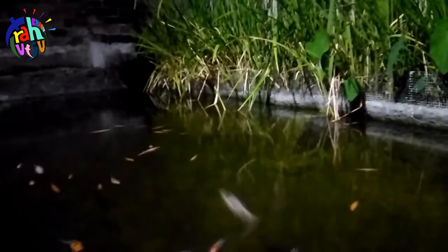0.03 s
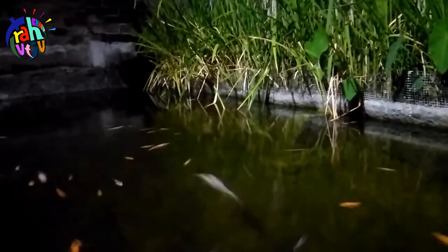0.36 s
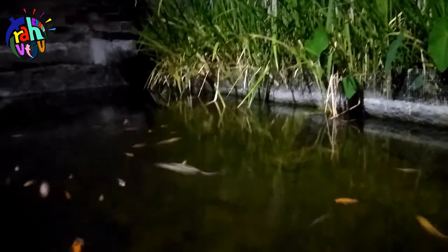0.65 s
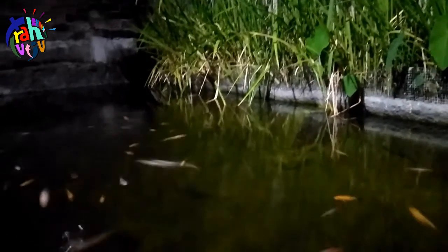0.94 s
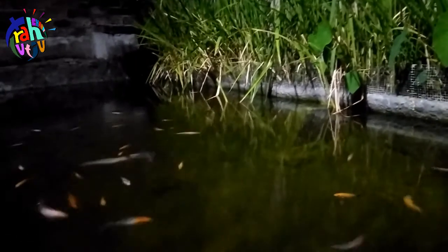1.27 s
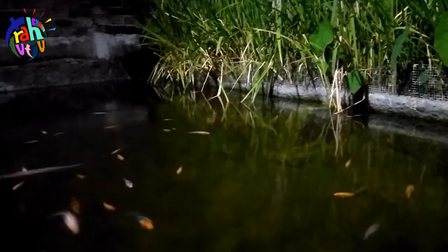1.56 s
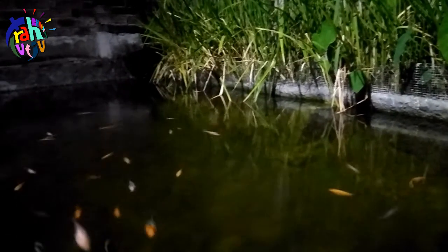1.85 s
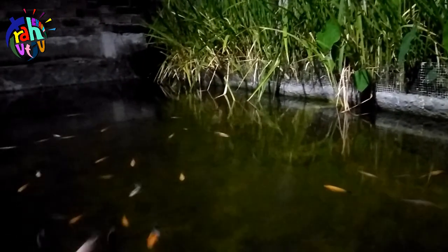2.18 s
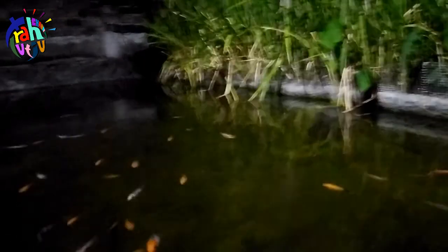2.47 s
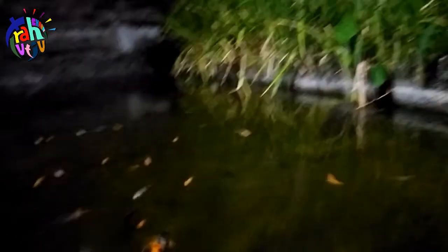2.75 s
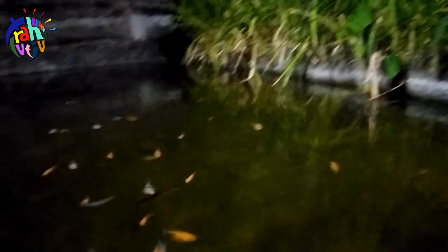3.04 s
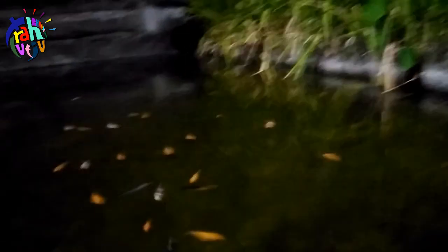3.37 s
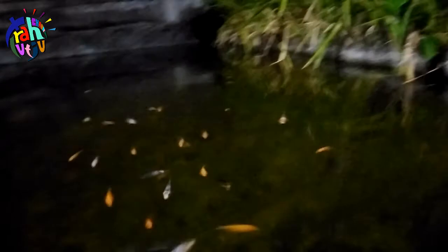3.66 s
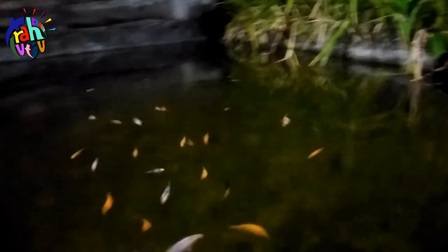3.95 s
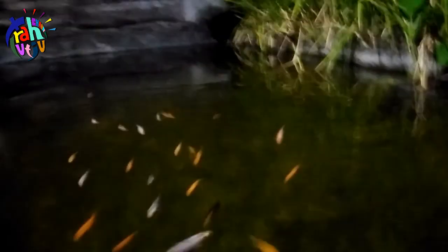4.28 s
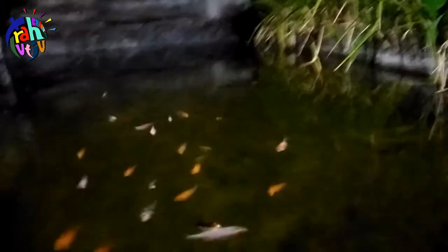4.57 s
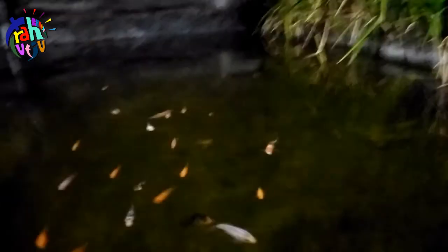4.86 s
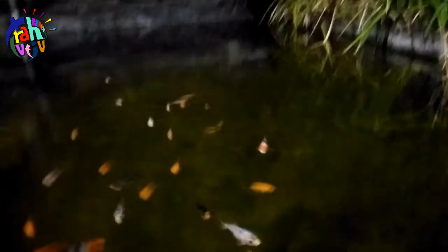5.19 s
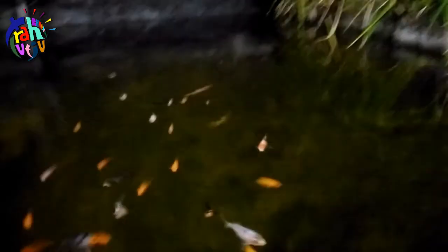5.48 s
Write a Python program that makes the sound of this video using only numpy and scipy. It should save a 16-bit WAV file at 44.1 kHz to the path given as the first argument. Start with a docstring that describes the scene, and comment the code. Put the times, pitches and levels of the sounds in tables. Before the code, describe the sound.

Loud, pulsing frog trill at a garden pond at night, ending to reveal softly trickling water and a few small drips.

```python
"""A tree frog trills beside a garden pond at night: 27 notes, each a rattle of vocal-sac pulses
that slows as the frog tires. Stone walls and the water throw every pulse back, and the frog is
louder on the left until the microphone turns. A thin trickle runs into the pond with ringing
drips and clicks of spray, over a low rumble, hiss and faint tones. The recorder's uneven
sampling adds a metallic sheen."""
import sys
import numpy as np
from scipy import signal
from scipy.fft import rfft, irfft
from scipy.io import wavfile
from scipy.ndimage import uniform_filter1d, map_coordinates

SR = 44100
rng = np.random.default_rng(int(sys.argv[2]) if len(sys.argv) > 2 else 0)


def generate_wav(signal):
    """Clip the signal to [-1, 1] and save it as 16-bit WAV at the path in sys.argv[1]."""
    frames = np.transpose(np.atleast_2d(signal))
    scaled = np.clip(frames, -1, 1) * 32767
    pcm = np.round(scaled).astype(np.int16)
    wavfile.write(sys.argv[1], SR, pcm)


N = 243431
TIME = np.arange(N) / SR
PITCH_HZ = 1376.6  # main ring of the vocal sac

# the frog at the pond's edge: (note start [s], slow pulses [count])
NOTES = [(.005, 2), (.173, 2), (.340, 2), (.506, 2), (.675, 3), (.864, 2), (1.035, 2), (1.205, 2),
         (1.378, 2), (1.550, 2), (1.718, 3), (1.902, 2), (2.067, 2), (2.234, 3), (2.422, 3), (2.608, 3),
         (2.793, 3), (2.980, 2), (3.151, 2), (3.322, 3), (3.512, 2), (3.683, 3), (3.873, 2), (4.048, 2),
         (4.221, 2), (4.410, 2), (4.589, 2)]
def tree_frog():
    """The frog repeats its rattling note in one long trill."""
    trill = np.zeros((2, N))
    for start, slow_count in NOTES:
        add(trill, start, note(start, slow_count))
    return trill


# how hard the frog pushes: (time [s], effort [dB])
EFFORT = [(0, -0.8), (.9, -1), (1.35, -1.5), (2.1, -0.5), (2.5, 0.5), (3.2, -2), (3.8, -1), (4.3, -4),
          (4.6, -2)]
def note(start, slow_count, waver=0.0067, longer_ring_from_s=3.9, turn_start_s=2.08, turn_length_s=2.537):
    """A run of pulses rings the vocal sac, heard from a slowly turning microphone."""
    t = np.arange(round(.2 * SR)) / SR
    effort_db = np.interp(start, *np.transpose(EFFORT))
    # the last notes ring longer and purer
    stretch = np.interp(start, [longer_ring_from_s, NOTES[-1][0]], [1, 1.08])
    times, sizes = pulse_train(slow_count, effort_db)
    pitches = PITCH_HZ * (1 + waver * rng.standard_normal(len(times)))
    voice = np.zeros((2, len(t)))
    for when, size, hz in zip(times, sizes, pitches):
        add(voice, when, size * sac_pulse(hz, stretch))
    turn = np.clip((start - turn_start_s) / turn_length_s, 0, 1)
    heard = near_echoes(voice, turn)
    octave_onset = times[-len(CLOSING) + 1]  # second pulse of the closing run
    heard += bright_octave(t - octave_onset, start, pitches[-1], effort_db)
    side_db = np.array([[-23], [-27.5 + 5 * turn]])  # the turn brings up the right side
    return gain_of(side_db + 0.45 * effort_db) * heard


# quick pulses that open a note: (time in the note [ms], relative level [dB])
OPENING = [(0, 2.34), (8.4, 2), (17.6, 0.5)]
# the quickening run that closes it: (time in the run [ms], relative level [dB])
CLOSING = [(0, 4), (8.6, 4), (15.4, -8.5), (19.4, -6), (23.3, -4.5)]
def pulse_train(slow_count, effort_db, slack_ms_per_db=0.88, jitter_ms=0.2775, uneven_db=1.42):
    """Pulse times [s] and sizes: less effort spaces out the slow middle and weakens the closing run."""
    gap_ms = 18.1 - slack_ms_per_db * effort_db
    *slow_ms, close_ms = OPENING[-1][0] + gap_ms * np.arange(1, round(slow_count) + 2)
    middle = [(ms, 0) for ms in slow_ms]
    closing = [(close_ms + ms, db + effort_db) for ms, db in CLOSING]
    ms, db = np.transpose(OPENING + middle + closing)
    times = (ms + jitter_ms * rng.standard_normal(len(ms))) / 1000
    # the last pulses fall in step with the still-ringing sac and merge into a slightly flat tone
    cycle = 1 / (PITCH_HZ * .96)
    times[-2:] = times[-3] + np.round((times[-2:] - times[-3]) / cycle) * cycle
    return times, gain_of(db + uneven_db * rng.standard_normal(len(ms)))


# sac modes: (frequency [x pitch], swell time [ms], relative level [dB], left emphasis [dB])
SAC_MODES = [(0.388, 0.8, -27, 8.5), (0.534, 1.83, -26.5, 8.5), (0.999, 0.54, 9, 4.5),
             (1.281, 2.4, -28.5, 12.5), (1.516, 0.47, -24, 11.5), (1.9, 0.61, -14.5, 5.5),
             (2.24, 1.3, -27, -9), (2.38, 0.39, -22, 4.5)]
def sac_pulse(pitch_hz, stretch):
    """One pulse rings every mode of the vocal sac, with a different colour on each side."""
    t = np.arange(SR // 24) / SR
    return sum(gain_of([[db + left_db], [db]]) * ring(t, pitch_hz * multiple, stretch * swell_ms / 1000)
               for multiple, swell_ms, db, left_db in SAC_MODES)


# the overtone that ends each note: (time [s], relative level [dB])
OCTAVE = [(0, -25.5), (1.3, -22), (3.2, -24.5), (3.7, -33)]
def bright_octave(t, note_start, pitch_hz, effort_db, spread_db=2):
    """The closing tone carries a ring about an octave up, stronger in some notes than in others."""
    db = np.interp(note_start, *np.transpose(OCTAVE)) + effort_db + spread_db * rng.standard_normal()
    return gain_of(db) * ring(t, 2655 * pitch_hz / PITCH_HZ, swell_s=.003)


# paths from the frog to each side of the microphone: (delay [ms], relative level [dB])
PATHS_LEFT = [(0.7, -5.4), (3.32, -3.3), (6.5, 0.5), (7.74, -7.3), (11.58, -9.3), (12.98, -5.2),
              (15.02, -5.5), (20.78, -9.1), (23.52, -8.3), (30.82, -10.8), (40.74, -14.9), (44.44, -15.5)]
PATHS_RIGHT = [(0.0, 0.0), (3.44, -14.5), (4.74, -6.6), (6.8, -12.2), (10.54, -13.9), (12.82, -9.9),
               (18.12, -17.3), (20.32, -13.0), (25.72, -16.2), (31.22, -19.1)]
def near_echoes(voice, turn, shift_ms=.26):
    """Nearby stone and water reflect each pulse; the paths shift, mostly late in the turn."""
    length = voice.shape[1]
    hz = np.fft.rfftfreq(length, 1 / SR)
    heard = []
    for side, paths in zip(voice, (PATHS_LEFT, PATHS_RIGHT)):
        delay_ms, path_db = np.transpose(paths)
        delay_ms = delay_ms + shift_ms * turn ** 4.7 * rng.standard_normal(len(paths))
        echoes = gain_of(path_db) @ np.exp(-2j * np.pi * np.outer(delay_ms / 1000, hz))
        heard.append(evened(irfft(rfft(side) * echoes, length)))
    return np.array(heard)


# walls at the far side of the garden: (delay [s], level [dB])
FAR_WALLS = [(0.05, -19.5), (0.063, -27.5), (.079, -25)]
def far_echoes(trill):
    """Distant walls return the trill late and faint."""
    echoes = np.zeros((2, N))
    for delay, db in FAR_WALLS:
        add(echoes, delay, gain_of(db) * trill)
    return echoes


# the loudest drops on the pond, left of the microphone: (time [s], level [dB], bubble pitch [Hz])
DRIPS = [(0.046, -42, 3900), (1.656, -40, 4930), (2.567, -39.5, 3790), (2.737, -42, 5000),
         (3.135, -42, 4086), (3.828, -39.5, 4770), (4.196, -37, 4860), (4.725, -37, 3570),
         (4.792, -41.5, 1930), (4.873, -49, 2360), (5.215, -32.5, 1906), (5.506, -37.5, 3340)]
# sharp clicks of spray, far to the right: (time [s], level [dB], pitch [Hz])
CLICKS = [(0.044, -41, 6700), (.1237, -43.5, 6800), (1.612, -40.5, 5470), (2.4205, -38, 7717),
          (4.108, -44, 8000), (5.1083, -55, 7650), (5.216, -44.5, 5800)]
# fine splashes, also to the right: (time [s], level [dB], length [s])
SPLASHES = [(1.599, -58.5, 0.08), (2.72, -60, 0.06), (4.092, -56, 0.064), (4.725, -59, 0.044)]
def drips_and_spray():
    """Single drops and bursts of spray hit the pond and stand out from the trickle."""
    water = np.zeros((2, N))
    for when, db, hz in DRIPS:
        add(water, when, gain_of(db) * sides(8.2) * bubble(hz))
    for when, db, hz in CLICKS:
        add(water, when, gain_of(db) * sides(-23) * click(hz))
    for when, db, length in SPLASHES:
        spray = evened(band(rng.standard_normal((2, round(length * SR))), 3400, 8000))
        add(water, when, gain_of(db) * sides(-19) * spray * np.hanning(spray.shape[1]))
    return water


def trickle(bubble_db=-56, spray_db=-57):
    """A thin stream scatters small bubbles and ticks of spray, most of them faint."""
    water = np.zeros((2, N))
    plips = [bubble(hz, cycles=9) for hz in np.geomspace(600, 4200, 60)]
    ticks = [click(6500) for _ in range(20)]
    for when, pitch, size, pan in rng.random((420, 4)):
        plip = sides(3 + 12 * (pan - .5)) * plips[int(pitch * len(plips))]
        add(water, when * N / SR, gain_of(bubble_db + 12 * size ** 3) * plip)
    for when, size, kind in rng.random((400, 3)):
        tick = sides(1.7) * ticks[int(kind * len(ticks))]
        add(water, when * N / SR, gain_of(spray_db + 9 * size ** 3) * tick)
    return water


def bubble(hz, cycles=18, glide=0.037, splash=0.76, rise_cycles=4):
    """A trapped bubble rings, rising a little, inside the hiss of its own splash."""
    turns = np.arange(SR // 16) / SR * hz
    age = turns / cycles
    tone = np.sin(2 * np.pi * turns * (1 + glide * np.minimum(age, 4) / 2))
    hiss = evened(band(rng.standard_normal(len(turns)), hz * 0.71, hz * 1.18))
    envelope = np.exp(-age) * (1 - np.exp(-turns / rise_cycles))
    return (tone + splash * hiss) / (1 + splash) * envelope


def click(hz, decay_s=0.0016):
    """A droplet bursts: a very short puff of noise."""
    t = np.arange(SR // 50) / SR
    puff = band(rng.standard_normal(len(t)) * np.exp(-t / decay_s), hz * .8, hz * 1.4)
    return puff / abs(puff).max()


def garden_tail(sound, t60_s=0.26, build_s=0.04):
    """Plants and walls around the microphone scatter a short diffuse tail."""
    t = np.arange(SR // 2) / SR
    envelope = 1000 ** (-t / t60_s) * (1 - np.exp(-(t / build_s) ** 2))
    tail = rng.standard_normal((2, len(t))) * envelope
    return signal.fftconvolve(sound, tail / np.linalg.norm(tail[0]), axes=1)[:, :N]


# pond and night air all around: (frequency [Hz], relative spectral level [dB])
WASH_SPECTRUM = [(20, -28), (65, 1), (160, -2), (320, -9), (550, -5), (1300, -4), (2500, -5), (3000, -9),
                 (3700, -7), (4600, -17), (5600, -16), (6500, -10), (8500, -18), (15500, -29)]
# their balance at the microphone: (frequency [Hz], left minus right [dB])
WASH_BALANCE = [(60, 4), (300, 8.5), (1300, 3.5), (3300, 6), (4800, -3.5), (7500, -8), (14000, -1)]
# how alike the two sides are: (frequency [Hz], correlation [0-1])
WASH_LIKENESS = [(60, 0.49), (200, 0.67), (700, 0.95), (3000, 0.023), (12000, 0.039)]
def pond_wash(level_db=-53, patchy_db=2):
    """Low rumble and the patchy wash of running water."""
    frames, hz = N // 256 + 5, np.fft.rfftfreq(1024, 1 / SR)
    left_re, left_im, apart_re, apart_im, patches = rng.standard_normal((5, len(hz), frames))
    patches = uniform_filter1d(patches, size=12, axis=0)  # smooth over frequency,
    patches = evened(uniform_filter1d(patches, size=6, axis=1))  # then over time
    likeness = np.clip(curve_at(WASH_LIKENESS, hz), -1, 1)
    side_db = curve_at(WASH_BALANCE, hz)
    left = left_re + 1j * left_im
    right = likeness * left + np.sqrt(1 - likeness ** 2) * (apart_re + 1j * apart_im)
    spectra = np.array([left * gain_of(side_db / 2), right * gain_of(-side_db / 2)])
    spectra *= gain_of(curve_at(WASH_SPECTRUM, hz) + patchy_db * patches)
    _, wash = signal.istft(spectra, nperseg=1024, noverlap=768)
    return gain_of(level_db) * evened(wash[:, :N])


# high hiss in the background: (time [s], level [dB])
HISS = [(0, -70.5), (4.7, -66.5), (4.85, -88), (5.2, -77.5), (5.25, -60), (5.52, -58.5)]
def high_hiss():
    """A thin hiss dips as the trill ends, then comes back louder."""
    hiss = evened(band(rng.standard_normal((2, N)), 5600, 16600))
    return hiss * gain_of(np.interp(TIME, *np.transpose(HISS)))


# a low hum, a faint ring and two thin whines, centred: (frequency [Hz], width [Hz], level [dB])
TONES = [(191.6, 27, -70.5), (2508, 66, -63.5), (8460, 120, -75.5), (10940, 55, -76.5)]
def faint_tones():
    """Narrow bands of noise sound as wavering tones."""
    return sum(gain_of(db) * evened(band(rng.standard_normal(N), hz - width / 2, hz + width / 2))
               for hz, width, db in TONES)


def gain_of(db):
    """Decibels as an amplitude factor."""
    return 10 ** (np.asarray(db) / 20)


def evened(x):
    """Scales to unit RMS."""
    return x / np.sqrt(np.mean(x ** 2) + 1e-20)


def curve_at(points, hz):
    """A spectrum table joined by straight lines over log frequency, as a column."""
    point_hz, value = np.transpose(points)
    return np.interp(np.log(hz + 1), np.log(point_hz + 1), value)[:, None]


def add(mix, start_s, sound):
    """Lays a stereo sound into the mix."""
    part = mix[:, max(round(start_s * SR), 0):][:, :sound.shape[1]]
    part += sound[:, :part.shape[1]]


def band(x, low_hz, high_hz):
    """A gentle band-pass."""
    sos = signal.butter(2, [low_hz, min(high_hz, .45 * SR)], "band", fs=SR, output="sos")
    return signal.sosfilt(sos, x)


def sides(db):
    """Left and right gains for a level difference; positive is left."""
    return gain_of([[db / 2], [-db / 2]])


def ring(t, hz, swell_s):
    """A tone that swells for four swell times and dies away."""
    age = np.maximum(t, 0) / swell_s
    return age ** 4 * np.exp(-age) * np.cos(2 * np.pi * hz * t)


def scene(frog_tail_db=-19, water_tail_db=-6):
    """From beside the pond: the frog, the water, the garden's echoes and the night air."""
    frog = tree_frog()
    water = drips_and_spray() + trickle()
    tail = garden_tail(gain_of(frog_tail_db) * frog + gain_of(water_tail_db) * water)
    return frog + far_echoes(frog) + water + tail + pond_wash() + high_hiss() + faint_tones()


def record(dry, slip_samples=0.87, slip_hz=3890, cutoff_hz=16000):
    """The sampling instant slips in a fast sawtooth, mirroring the trill into the band-limited treble."""
    position = np.arange(N) - slip_samples * (TIME * slip_hz % 1)
    slipped = np.array([map_coordinates(side, [position], order=3) for side in dry])
    low_pass = signal.firwin(255, cutoff_hz, window=("kaiser", 8), fs=SR)
    return signal.oaconvolve(slipped, low_pass[None], "same")


dry = scene()
out = record(dry)
generate_wav(out)
```